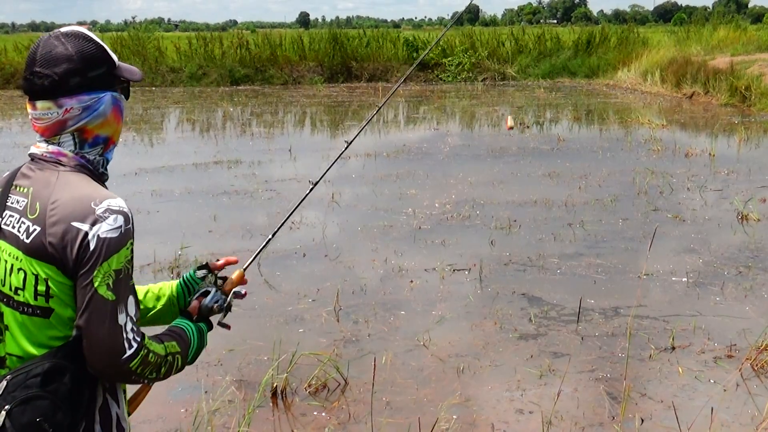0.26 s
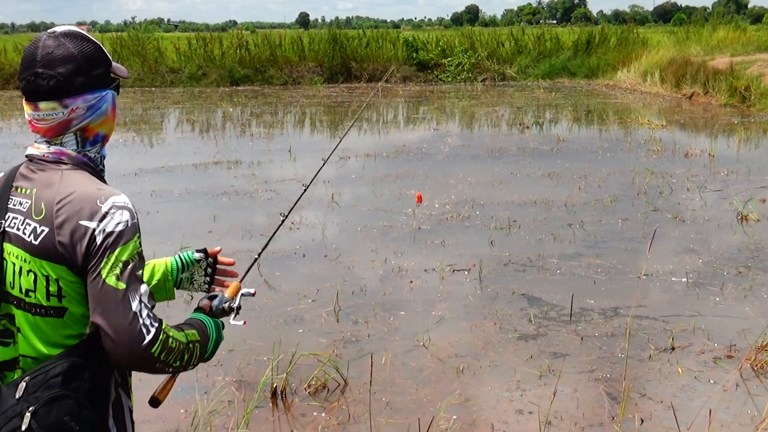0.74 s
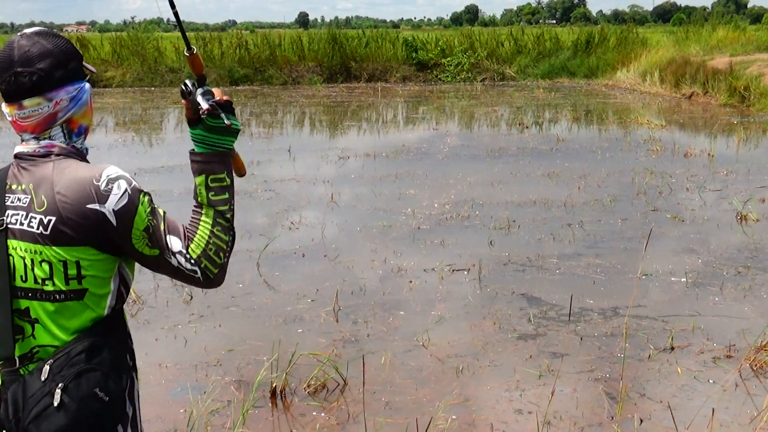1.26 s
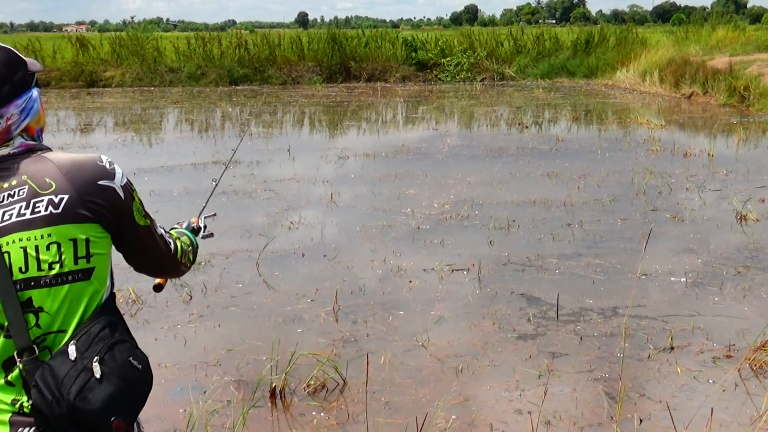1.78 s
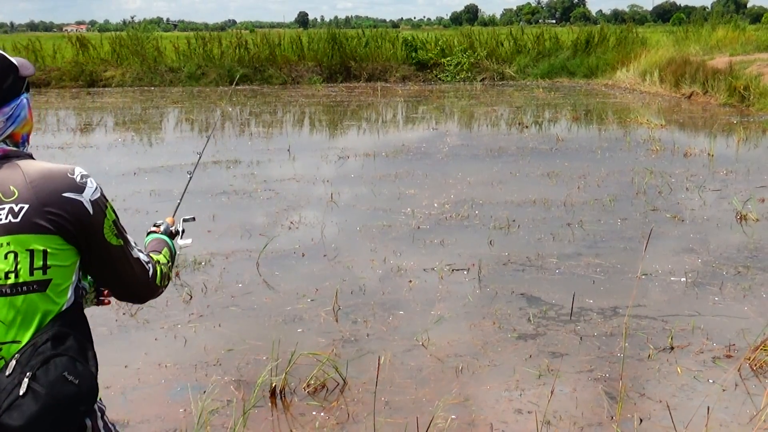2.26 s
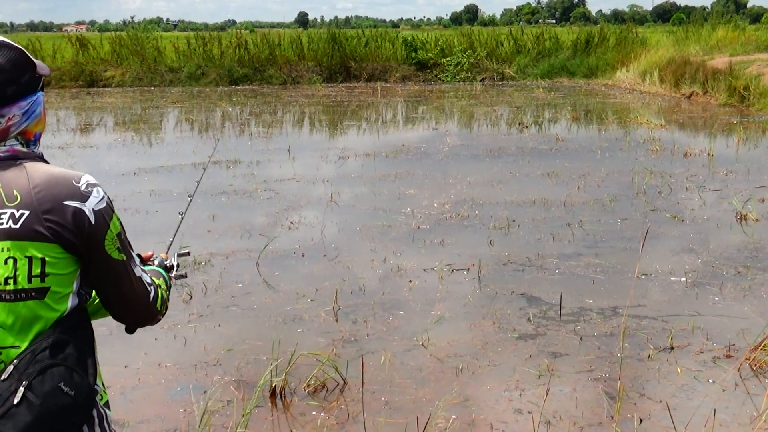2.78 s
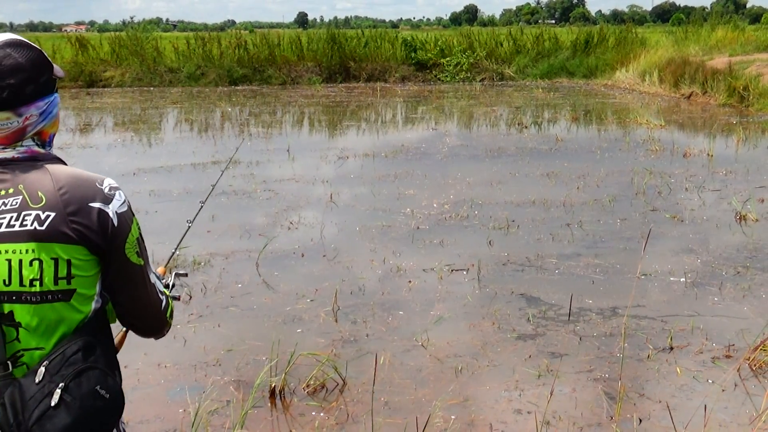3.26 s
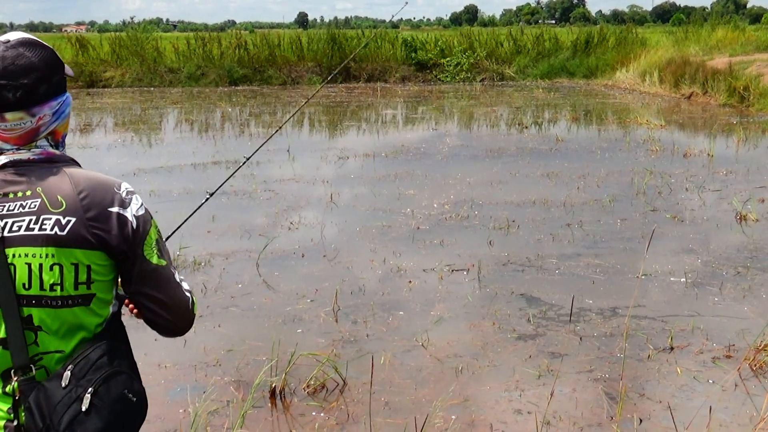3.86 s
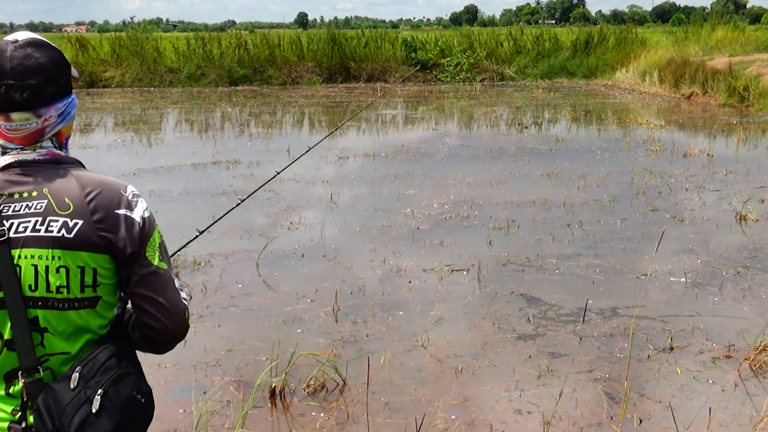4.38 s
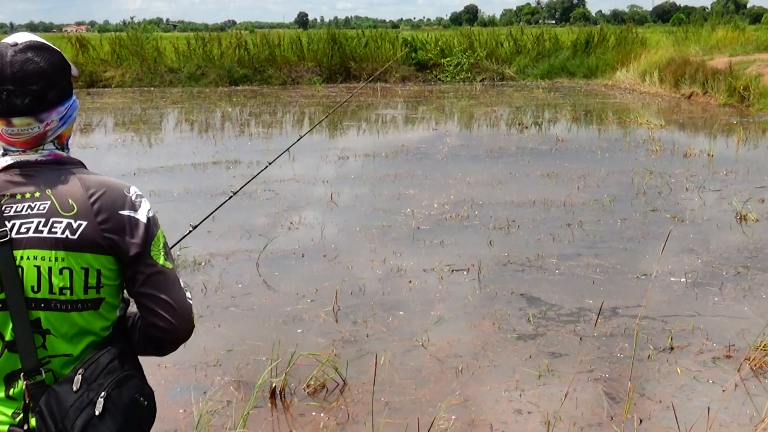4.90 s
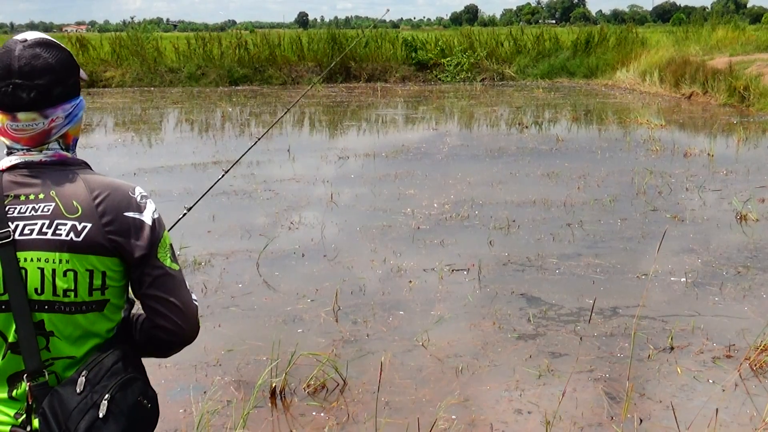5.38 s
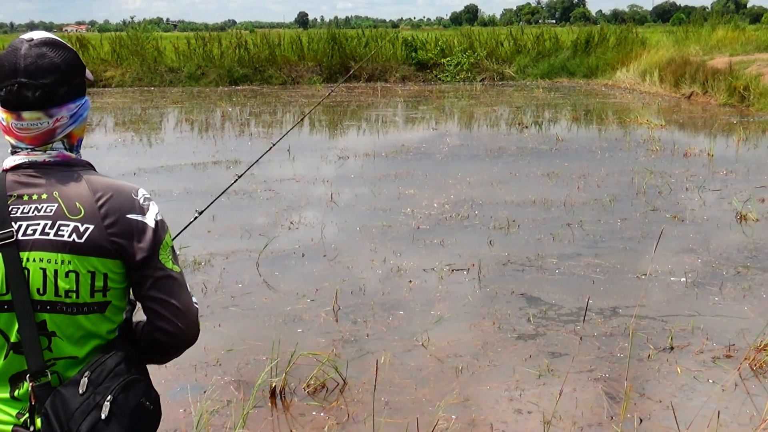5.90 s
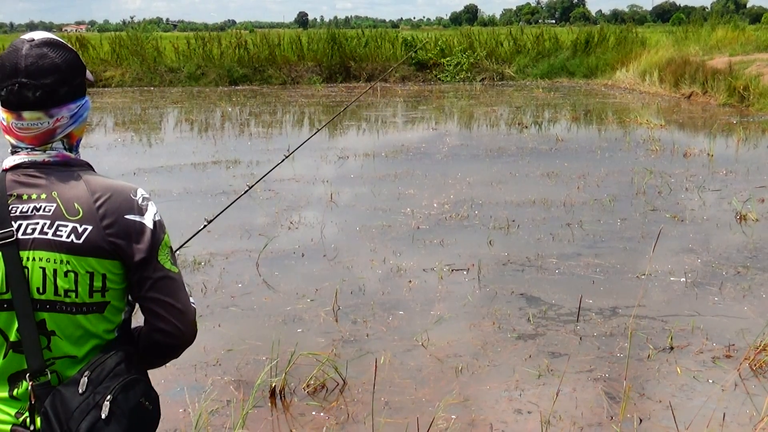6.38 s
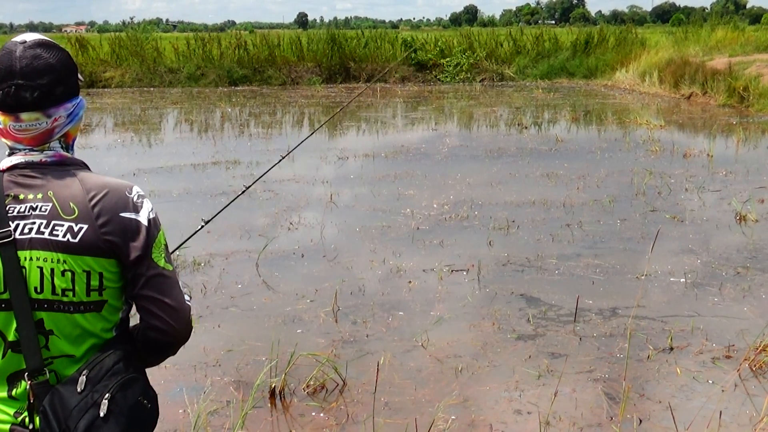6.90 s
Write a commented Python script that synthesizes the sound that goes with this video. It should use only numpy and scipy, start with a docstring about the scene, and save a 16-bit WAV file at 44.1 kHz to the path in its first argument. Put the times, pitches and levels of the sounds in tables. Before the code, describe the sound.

A single-cylinder engine thuds steadily across an open field while a fishing rod is cast close by with swish, whip and reel clicks.

```python
"""A single-cylinder pump engine thuds across a flooded field: each firing rings pipe modes and knocks the block.
Close by an angler casts: noise rustles, swishes back and whips forward; clicks ring the modes of the reel.
Glided sines whistle and chip as birds, an insect trills in FM and another buzzes in noisy strokes.
Low noise, puffs and rising notes are a light wind on the microphone, over faint field noise and hiss."""
import sys
import numpy as np
from scipy import signal
from scipy.io import wavfile

SR = 44100
rng = np.random.default_rng(int(sys.argv[2]) if len(sys.argv) > 2 else 0)


def transcribe(u):
    """Save the signal u as a 16-bit wav file named by the first command-line argument.

    u: samples, shape (n,) or (channels, n), limited to [-1, 1]; the rate is SR.
    q: integer samples, one column per channel.
    """
    v = np.clip(np.atleast_2d(u).T, -1, 1)
    q = np.round(v * 32767).astype(np.int16)
    wavfile.write(sys.argv[1], SR, q)


N = 314874
TIME = np.arange(N) / SR


def amp(db):
    """Gain of a level in dB."""
    return 10 ** (np.asarray(db) / 20)


def rms_one(x):
    """Scale to rms 1."""
    return x / np.sqrt(np.mean(x ** 2) + 1e-20)


def in_time(rows):
    """Columns of a (time [s], ..) curve, one value per sample."""
    s, *columns = np.transpose(rows)
    return [np.interp(TIME, s, column) for column in columns]


def level(rows):
    """Gain of a (time [s], .., level [dB]) curve, silent outside it."""
    inside = (TIME >= rows[0][0]) * (TIME < rows[-1][0])
    return amp(in_time(rows)[-1]) * inside


def at_hz(points, hz):
    """Read a spectrum on a log-frequency axis."""
    point_hz, value = np.transpose(points)
    return np.interp(np.log(hz), np.log(point_hz), value)


def pan(x, db):
    """Lean a sound to the left by db."""
    return x * amp([[db / 2], [-db / 2]])


def drift(rate_hz):
    """Smooth random curve of rms 1: noise through a double pole, at 1/40 of the sample rate."""
    step, settle = 40, 2000
    pole = np.exp(-2 * step * np.pi * rate_hz / SR)
    white = rng.standard_normal(N // step + settle + 2)
    slow = signal.lfilter([1], [1, -2 * pole, pole ** 2], white)[settle:]
    return np.interp(np.arange(N) / step, np.arange(len(slow)), rms_one(slow))


def clicks(times_s, sizes):
    """A click train."""
    out = np.full(N, 1e-18)   # tiny offset in place of exact zero
    index = np.clip((np.asarray(times_s) * SR).astype(int), 0, N - 1)
    np.add.at(out, index, sizes)
    return out


def ring(x, hz, t60_s):
    """Two-pole resonator: a unit click starts a decaying sine of height 1."""
    pole, w = amp(-60 / (t60_s * SR)), 2 * np.pi * hz / SR
    return signal.lfilter([0, np.sin(w)], [1, -2 * pole * np.cos(w), pole ** 2], x)


def decay(x, t60_s):
    """One-pole decay: a unit click becomes a dying envelope."""
    return signal.lfilter([1], [1, -amp(-60 / (t60_s * SR))], x)


def spread(mid, side, alike):
    """Stereo pair with the given left-right likeness from two independent noises."""
    return np.sqrt(1 + alike) * mid + np.sqrt(1 - alike) * side * [[1], [-1]]


def stereo_white(alike):
    """White noise on two channels with the given likeness."""
    mid, side = rng.standard_normal((2, N))
    return spread(mid, side, alike)


# default stereo width of noise: (frequency [Hz], left-right likeness [-1..1])
LIKENESS = [(30, .97), (60, 1), (150, 0.97), (300, 0.94), (450, 0.54), (700, 0.036), (1300, 0.13),
            (2500, .5), (4500, 0.54), (7000, 1), (10000, 1), (15000, .999)]


def coloured(spectrum, patchy_db, alike=None):
    """About third-octave bands of stereo noise, each with its own level and flicker; rms 1."""
    out, white = 0, rng.standard_normal((2, 2, N))
    bottom_hz, top_hz = spectrum[0][0], spectrum[-1][0]
    edges = np.geomspace(bottom_hz, top_hz, int(3 * np.log2(top_hz / bottom_hz)) + 1)
    for k, (low, high) in enumerate(zip(edges, edges[1:])):
        band = signal.butter(2, [low, high], "band", fs=SR, output="sos")
        mid, side = signal.sosfilt(band, white[k % 2])   # neighbouring bands use different noise
        hz = np.sqrt(low * high)
        likeness = np.clip(at_hz(LIKENESS, hz) if alike is None else alike, -1, 1)
        gain = amp(at_hz(spectrum, hz) + patchy_db * drift(6.7))
        out = out + gain * spread(mid, side, likeness)
    return rms_one(out)


def resonant(x, peaks):
    """Parallel resonances (frequency [Hz], width [Hz], level [dB]), alternating signs; rms 1."""
    out = 0
    for k, (hz, width_hz, db) in enumerate(peaks):
        out = out + (-1) ** k * amp(db) * signal.lfilter(*signal.iirpeak(hz, hz / width_hz, SR), x)
    return rms_one(out)


def sine(hz):
    """A sine that follows a frequency per sample."""
    return np.sin(2 * np.pi * np.cumsum(hz) / SR)


# distant field noise: (frequency [Hz], density [dB per Hz])
FIELD_COLOUR = [(300, 1), (420, -5), (600, -11.5), (1300, -15.5), (3000, -25), (5000, -16.5), (6800, -31.5),
                (9300, -37), (11500, -25.5), (13200, -28), (14500, -22), (16500, -33)]
# hiss bands: (frequency [Hz], width [Hz], level per filter pass [dB])
HISS_BANDS = [(9950, 2100, -1.6), (14200, 1400, -0.42)]
FIELD_DB, HISS_DB = -57.5, -69


def field():
    """Patchy distant noise plus two steady hiss bands, filtered twice for steeper skirts."""
    hiss = resonant(resonant(stereo_white(.998), HISS_BANDS), HISS_BANDS)
    return amp(FIELD_DB) * coloured(FIELD_COLOUR, patchy_db=1.6) + amp(HISS_DB) * hiss


BUZZ_HZ, BUZZ_PER_S, BUZZ_T60_S, BUZZ_DB = 14300, 112.4, .006, -71


def buzz():
    """High insect that never stops: even wing strokes, each a scratch of noise in one resonance."""
    strokes = clicks(np.arange(0, N / SR, 1 / BUZZ_PER_S), 1)
    scratch = decay(strokes, BUZZ_T60_S) * rng.standard_normal(N)
    return amp(BUZZ_DB + 2.3 * drift(5)) * resonant(scratch, [(BUZZ_HZ, 900, 0)])


# insect trills: (start [s], end [s], level [dB])
TRILLS = [(.245, .37, -61), (.465, .595, -63), (.65, .71, -66), (1.07, 1.13, -62), (1.36, 1.43, -64),
          (4.14, 4.21, -65), (4.37, 4.56, -62), (4.68, 4.76, -65)]


def trill():
    """Insect: a sine with fast, slightly irregular pitch wobble, gated into short calls."""
    wobble = 4 * np.sin(2 * np.pi * 85 * TIME + 2 * drift(12))
    tone = np.sin(2 * np.pi * 4950 * TIME + wobble + 3 * drift(40))
    gate = sum(amp(db) * np.clip(np.minimum(TIME - start, end - TIME) / .03, 0, 1)
               for start, end, db in TRILLS)
    return amp(3 * drift(60)) * gate * tone


WHISTLE_EDGE_S = .006


def whistle(start_s, length_s, low_hz, high_hz, db):
    """A short even rise with soft ends."""
    end_s, edge_s = start_s + length_s, WHISTLE_EDGE_S
    hz = np.interp(TIME, [start_s, end_s], [low_hz, high_hz])
    swell = level([(start_s - edge_s, db - 15), (start_s + edge_s, db),
                   (end_s - edge_s, db), (end_s + edge_s, db - 15)])
    return swell * sine(hz)


CHIP_DROP_S, CHIP_RISE_S, CHIP_FADE_S = .008, .006, .04


def chip(start_s, high_hz, low_hz, db, fade_db_per_s):
    """A note that drops fast, levels out and fades."""
    hz = low_hz + (high_hz - low_hz) * np.exp(-np.clip(TIME - start_s, 0, 1) / CHIP_DROP_S)
    top_s = start_s + CHIP_RISE_S
    swell = level([(start_s, db - 18), (top_s, db), (top_s + CHIP_FADE_S, db - CHIP_FADE_S * fade_db_per_s)])
    return swell * sine(hz)


# rising whistles: (start [s], length [s], start pitch [Hz], end pitch [Hz], relative level [dB])
WHISTLES = [(0.698, 0.039, 3930, 4160, -57), (0.823, .03, 3700, 3790, -55.5),
            (0.927, .042, 3800, 4300, -53), (.98, .035, 4400, 4550, -62), (1.024, .025, 3750, 4030, -57),
            (1.12, .08, 3560, 4370, -56), (1.377, 0.061, 3820, 4400, -55), (1.455, .035, 3500, 4040, -53)]
# falling chips: (start [s], start pitch [Hz], end pitch [Hz], relative level [dB], fade [dB/s])
CHIPS = [(4.342, 8600, 5360, -51, 700), (5.447, 8300, 5400, -50, 900), (6.543, 7600, 5300, -53, 1200),
         (6.562, 9800, 5200, -56, 350)]


def birds():
    """Thin whistles and chips, frayed by the distance; the whistles echo off the far bank."""
    thin_air = drift(150)
    whistles = (.6 + .55 * thin_air) * sum(whistle(*row) for row in WHISTLES)
    whistles = whistles + .25 * np.roll(whistles, int(.021 * SR))   # echo
    chips = .75 * amp(3 * np.tanh(thin_air)) * sum(chip(*row) for row in CHIPS)
    return chips + pan(whistles, db=5.5)


def wildlife():
    """Birds, trilling insect and buzzing insect."""
    return birds() + buzz() + pan(trill(), db=4)


EDDY_RANGE_DB = 25   # swell and fade


def eddy(peak_s, peak_hz, octaves_per_s, db, swell_s, fade_s):
    """A low note that climbs while an eddy sweeps over the microphone, swelling and fading."""
    hz = peak_hz * 2 ** (octaves_per_s * np.clip(TIME - peak_s, -swell_s, fade_s))
    faint_db = db - EDDY_RANGE_DB
    swell = level([(peak_s - swell_s, faint_db), (peak_s, db), (peak_s + fade_s, faint_db)])
    return swell * sine(hz)


# rumble level: (time [s], level [dB])
WIND = [(0, -45), (.4, -45), (1.3, -48.5), (1.89, -49), (2.46, -50), (2.78, -52), (3.14, -48.5),
        (3.98, -52.5), (5.07, -51), (5.51, -46.5), (5.93, -52), (6.54, -49), (6.88, -48), (7.14, -52)]
# rumble colour: (frequency [Hz], density [dB per Hz])
WIND_COLOUR = [(20, -16), (35, -4.5), (60, 2), (120, -0.5), (250, -8.5), (450, -34.5), (800, -21.5)]
# puffs, uneven at the two microphone ports: (peak time [s], half length [s], level [dB])
PUFFS = [(0.344, .06, -54), (.68, 0.18, -50), (1.052, .06, -62), (1.421, .04, -53), (1.83, 0.047, -51),
         (2.02, 0.11, -53), (3.063, 0.044, -51), (3.58, 0.069, -57), (4.06, .04, -58), (5.22, .1, -57),
         (5.57, .12, -51), (6.018, 0.08, -51), (6.6, .09, -52)]
# puff colour: (frequency [Hz], density [dB per Hz])
PUFF_COLOUR = [(40, -2), (110, -1), (200, -3), (330, -22)]
# eddies: (peak time [s], pitch at peak [Hz], climb [octaves/s], peak level [dB], swell [s], fade [s])
EDDIES = [(.34, 63.7, 8.15, -42, 0.061, .09), (5.585, 130, 7, -39, 0.175, .05)]
# low bumps: (time [s], relative level [dB], frequency [Hz], t60 [s])
BUMPS = [(.408, -41, 529, 0.11), (.44, -47.5, 794, .05), (4.713, -22.5, 94, 0.04), (4.893, -34, 70, 0.062)]


def wind():
    """Lumpy noise rumble, uneven puffs, passing eddies and a few ringing low bumps."""
    rumble = level(WIND) * coloured(WIND_COLOUR, patchy_db=1.5)
    bumps = sum(amp(db) * ring(clicks([s], .95), hz, t60_s) for s, db, hz, t60_s in BUMPS)
    gusts = sum(amp(db) * np.clip(1 - abs(TIME - s) / half_s, 0, 1) for s, half_s, db in PUFFS)
    puffs = gusts * amp(3.3 * drift(20)) * coloured(PUFF_COLOUR, patchy_db=.5, alike=.3)
    eddies = sum(eddy(*row) for row in EDDIES)
    return rumble + puffs + pan(eddies + bumps, db=2.5)


def low_noise(cutoff_hz):
    """Low-passed noise of rms 1."""
    low_pass = signal.butter(2, cutoff_hz, fs=SR, output="sos")
    return rms_one(signal.sosfilt(low_pass, rng.standard_normal(N)))


# back cast, line sings higher as it moves faster: (time [s], pitch [Hz], level [dB])
SWISH = [(1.19, 4900, -57), (1.23, 6640, -54), (1.275, 7500, -47), (1.32, 6360, -46.5), (1.36, 4570, -50.5),
         (1.39, 3870, -75)]


def back_cast():
    """Singing air: noise-modulated sines, a narrow one for the line, a wide lower one for the rod."""
    phase = 2 * np.pi * np.cumsum(in_time(SWISH)[0]) / SR
    line = low_noise(200) * np.sin(phase)
    rod = .9 * low_noise(1100) * np.sin(.76 * phase)
    return level(SWISH) * (line + rod)


# sleeves and line: (time [s], relative level [dB])
RUSTLE = [(0, -59), (.205, -57.5), (.349, -64.5), (.584, -60.5), (.703, -56.5), (.858, -62), (1.063, -59),
          (1.262, -52.5), (1.412, -59.5), (1.661, -48.5), (1.811, -48), (1.961, -57.5), (2.2, -43),
          (2.365, -43), (2.45, -49), (2.684, -57), (2.824, -55), (3.048, -58.5), (3.5, -59), (4.255, -63),
          (5.014, -61.5), (7.139, -67)]
# rustle colour: (frequency [Hz], density [dB per Hz])
RUSTLE_COLOUR = [(2500, -37), (4000, -14.5), (6200, -9), (7600, -7.5), (9000, 1), (10800, -10.5),
                 (13000, -11), (16500, -19)]
# forward cast: (time [s], line in the guides [dB], air torn by the rod [dB])
WHIP = [(1.44, -76, -59), (1.484, -59, -53.5), (1.524, -32, -33.5), (1.551, -33.5, -37),
        (1.563, -27.5, -34), (1.604, -43, -42), (1.72, -71, -56.5)]
# torn air colour: (frequency [Hz], density [dB per Hz])
WHIP_COLOUR = [(250, -12), (450, 6), (800, 4.5), (1300, 7.5), (2000, 6.5), (3500, 6.5), (6000, 3.5),
               (9000, -3)]
# spool whine as line pays out: (time [s], pitch [Hz], level [dB])
SPOOL = [(1.6, 1940, -62), (1.62, 1875, -47), (1.66, 1800, -52), (1.7, 1700, -68)]


def cast():
    """Grainy rustle of cloth, singing back cast, broad whip forward and spool whine."""
    grains = amp(2 * drift(150) + 1.06 * drift(42))
    line = level(np.array(WHIP)[:, :2])   # line ripping through the guides hisses like the cloth
    rustle = (level(RUSTLE) + line) * grains * coloured(RUSTLE_COLOUR, patchy_db=0, alike=1)
    whip = level(WHIP) * amp(2 * drift(65)) * coloured(WHIP_COLOUR, patchy_db=4, alike=1)
    spool = level(SPOOL) * sine(in_time(SPOOL)[0])
    return pan(rustle + whip + back_cast() + spool, db=.47)


# clutch and gear blows: (time [s], drive level [dB], favoured frequency [Hz], rattle t60 [s])
CLUTCH = [(0.2112, -14.5, 6000, .008), (0.2119, -8, 8600, 0.011), (.2131, -28, 5000, 0.0053),
          (0.2132, -21.5, 8600, 0.043), (1.554, -21, 8000, 0.0088), (1.558, -17, 5500, 0.0083),
          (1.563, -9, 6000, 0.011), (1.5667, -20, 8500, 0.0086), (3.51, -35, 1900, .02),
          (3.647, -29, 4000, 0.022), (3.65, -22, 10000, 0.0061), (3.6516, -7, 5070, 0.017),
          (3.6538, -19.5, 8300, 0.059)]
# reel modes: (frequency [Hz], level [dB], t60 [s])
REEL_MODES = [(2000, -7.5, 0.0032), (3180, -9, 0.0033), (4600, -6.5, 0.0029), (6400, -4.5, 0.0017),
              (8600, -2.5, 0.003), (10800, -8.5, 0.0021), (12030, -15.5, 0.0045), (15300, -18, 0.0018)]
# loudest ticks of reel, guides and line: (time [s], drive level [dB])
TICKS = [(0.186, -32), (0.4123, -34), (0.5483, -36), (.619, -34), (.6769, -33), (0.7256, -24),
         (0.9309, -27), (1.052, -20), (1.1965, -30), (1.277, -24.5), (1.6412, -25), (1.8193, -32),
         (2.4833, -29.5), (2.6722, -31.5), (2.7307, -27), (3.1836, -31), (3.236, -20.5), (3.4494, -34),
         (3.7615, -40), (3.7723, -34), (3.7815, -34), (4.0173, -33), (4.1066, -33), (5.3469, -33),
         (5.8526, -40), (5.886, -32), (5.994, -40), (6.1604, -42), (6.6847, -40), (6.9586, -35)]
FAINT_TICKS_PER_S, FAINT_TICK_DB = 5, -41


def reel():
    """Clutch snaps rattle through the reel's modes; ticks drive mainly the high ones."""
    out = np.zeros(N)
    grit = rng.standard_normal(N) * (rng.random(N) < .3)   # sparse noise
    tick_s, tick_db = np.transpose(TICKS)
    faint_db = FAINT_TICK_DB + 3.5 * rng.standard_normal(N)
    faint = (rng.random(N) < FAINT_TICKS_PER_S / SR) * amp(faint_db)
    for k, (hz, mode_db, t60_s) in enumerate(REEL_MODES):
        thin_db = 16 * max(np.log2(8500 / hz), 0)   # ticks lose 16 dB per octave below 8500 Hz
        drive = clicks(tick_s, amp(tick_db - thin_db + rng.normal(0, 3, len(tick_s))))
        drive += faint * amp(-thin_db)
        for s, db, favoured_hz, rattle_s in CLUTCH:
            hit = clicks([s], amp(db - 5 * abs(np.log2(hz / favoured_hz))))
            drive += hit + .29 * grit * decay(hit, rattle_s)
        out += (-1) ** k * amp(mode_db) * ring(drive, hz, t60_s)
    high_pass = signal.butter(2, 1300, "high", fs=SR, output="sos")   # too small to radiate bass
    return pan(signal.sosfilt(high_pass, out), db=1.4)


# engine speed: (time [s], firing rate [1/s])
SPEED = [(0, 15.98), (.649, 16.1), (1.298, 16.136), (1.947, 16.138), (2.596, 16.031), (3.245, 15.965),
         (3.895, 15.904), (4.544, 16.044), (5.193, 16.094), (5.842, 16.072), (6.491, 16.142),
         (7.14, 16.136)]
# pipe and silencer; short modes shape the thud, long ones hum: (frequency [Hz], relative swing, t60 [s])
EXHAUST = [(66, .0448, .027), (91.5, -.1, .021), (147, .0456, .037), (340, -.0154, .021), (178, .0026, .4),
           (223.4, .002, .4), (284, .0029, .086), (313.5, .002, .33), (401, .0007, .3)]
# relative levels through the air: (time [s], knock [dB], low clatter [dB], high clatter [dB])
ENGINE = [(0, -67, -53.5, -63), (.99, -66.5, -55, -62.5), (1.57, -60, -54, -60), (2.34, -72, -52, -60),
          (2.8, -70.5, -55.5, -66.5), (4.06, -64, -60, -67), (4.97, -61, -57.5, -61.5),
          (5.59, -58, -57, -57.5), (5.89, -59, -60, -56.5), (7.14, -59, -60, -56.5)]
# block resonances: (frequency [Hz], width [Hz], level [dB])
KNOCK = [(1030, 49, -9), (1520, 150, -0.5), (2150, 300, 4.5), (3120, 220, 6), (4040, 280, 2),
         (5800, 1000, -11)]
# low clatter resonances: (frequency [Hz], width [Hz], level [dB])
LOW_CLATTER = [(1060, 660, -8.5), (1536, 160, -0.5), (1838, 200, 3.5), (2270, 286, -2.5),
               (2800, 480, -12.5)]
# high clatter resonances: (frequency [Hz], width [Hz], level [dB])
HIGH_CLATTER = [(2410, 1460, 2.5), (3140, 900, 6), (3810, 280, -1.5)]
# narrow casing rings: (frequency [Hz], width [Hz], level [dB])
CASING = [(1018, 45, -0.5), (1255, 82, -2), (1538, 49, 2), (1930, 74, -7.5), (2387, 64, -0.5)]
FIRST_TURN = .441   # part of a cycle done at the start
THUD_DB = .56
CASING_DB, MIDDLE_DB = -66, -62   # casing level when the high clatter is at MIDDLE_DB
CASING_YIELDS = .99   # dB lost per dB of high clatter


def engine():
    """Each firing thumps the exhaust and knocks the block; valves and gears clatter in between."""
    knock_db, low_db, high_db = in_time(ENGINE)
    casing_db = CASING_DB - CASING_YIELDS * (high_db - MIDDLE_DB)
    turns = FIRST_TURN + np.cumsum(in_time(SPEED)[0]) / SR
    fired_s = np.flatnonzero(np.diff(np.floor(turns))) / SR
    luck = rng.standard_normal((len(fired_s), 2))

    push = clicks(fired_s, amp(.5 * luck[:, 0]))
    thud = amp(THUD_DB) * sum(swing * ring(push, hz, t60_s) for hz, swing, t60_s in EXHAUST)

    blows = clicks(fired_s + .0013, amp(luck[:, 1]))
    burst = signal.oaconvolve(blows, np.hanning(int(.008 * SR)))[:N]   # a rounded puff
    knock = amp(knock_db) * rms_one(burst) * resonant(stereo_white(.95), KNOCK)

    beat = amp(2 * np.cos(2 * np.pi * (turns - .25)) + 1.2 * drift(35))   # louder after the firing
    clatter = amp(low_db) * resonant(stereo_white(.94), LOW_CLATTER)
    clatter = clatter + amp(high_db) * resonant(stereo_white(.74), HIGH_CLATTER)
    clatter = clatter + amp(casing_db) * resonant(stereo_white(.76), CASING)
    return thud + pan(knock + (beat + .5 * burst) * clatter, db=3.5)


def scene():
    """Open field, wildlife, wind, angler and engine together."""
    return field() + wildlife() + wind() + cast() + reel() + engine()


CUTOFF_HZ = 16000


def record(dry):
    """Cut the top: steep low-pass, 50 dB down from the cutoff up."""
    return signal.sosfilt(signal.cheby2(20, 50, CUTOFF_HZ, fs=SR, output="sos"), dry)


dry = scene()
out = record(dry)
transcribe(out)
```